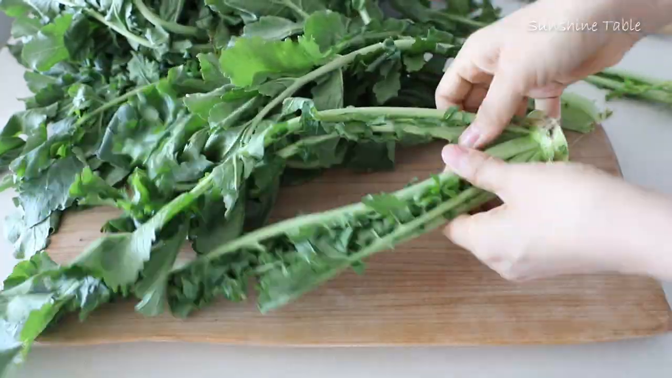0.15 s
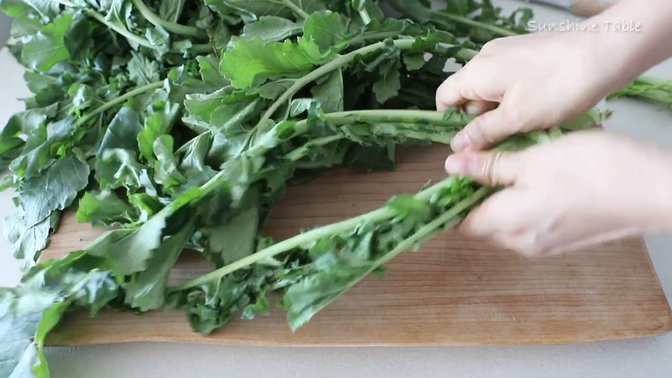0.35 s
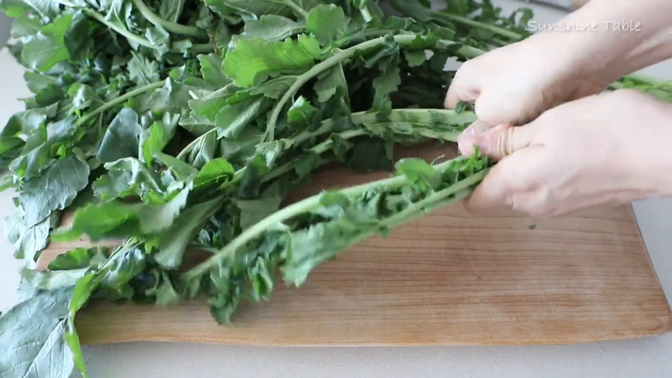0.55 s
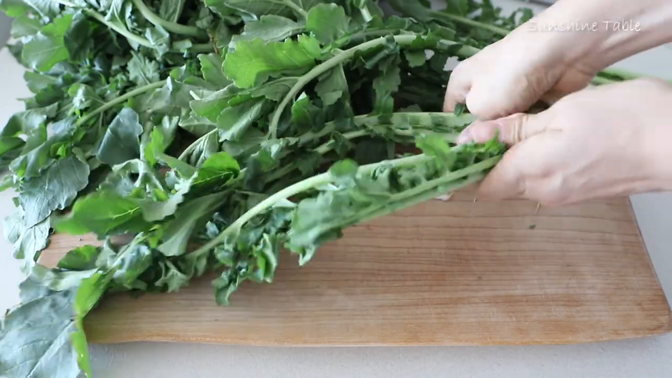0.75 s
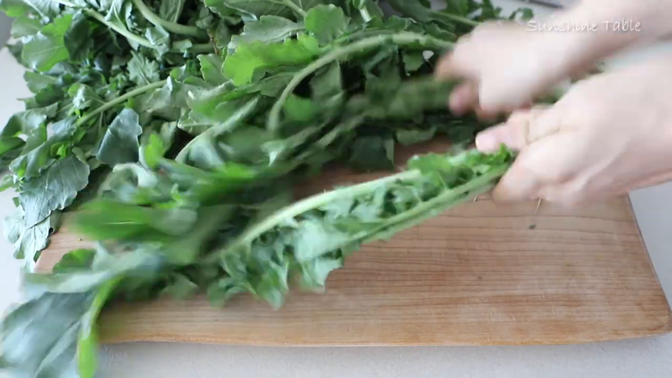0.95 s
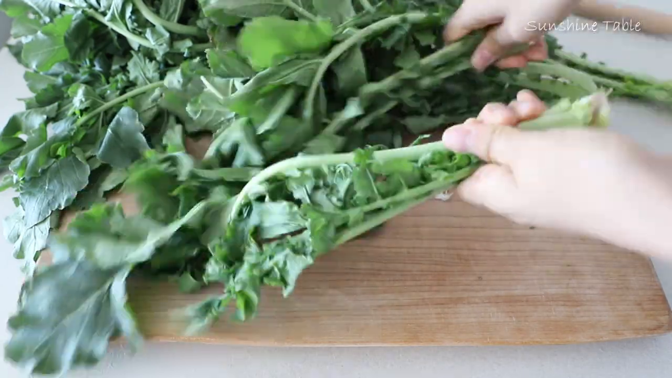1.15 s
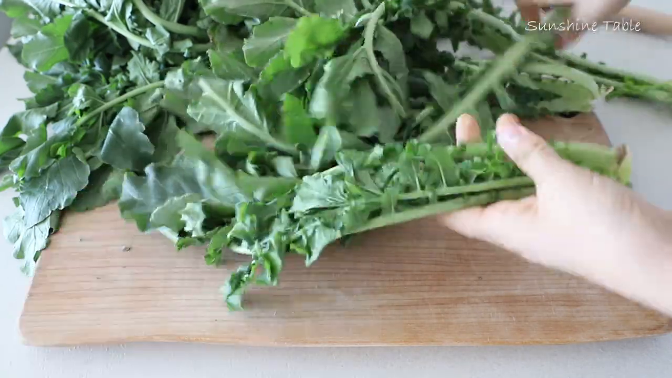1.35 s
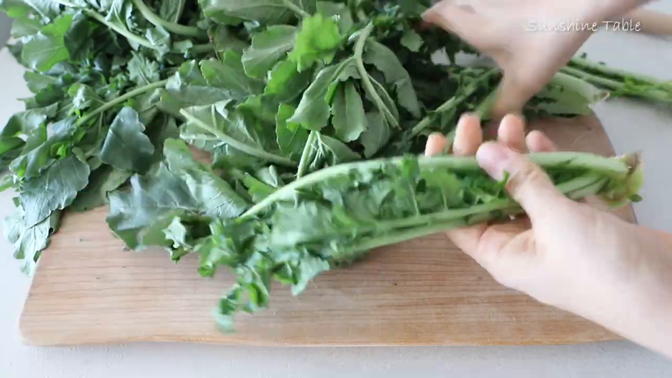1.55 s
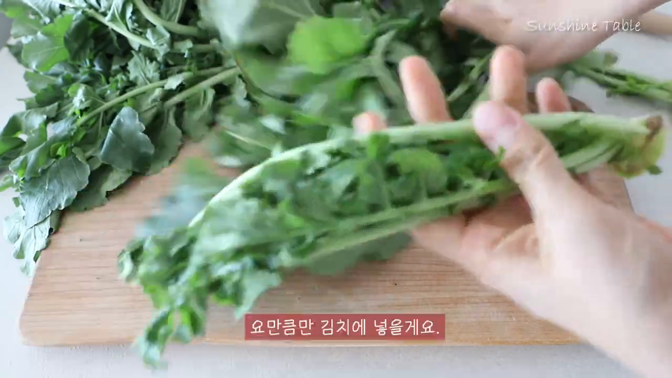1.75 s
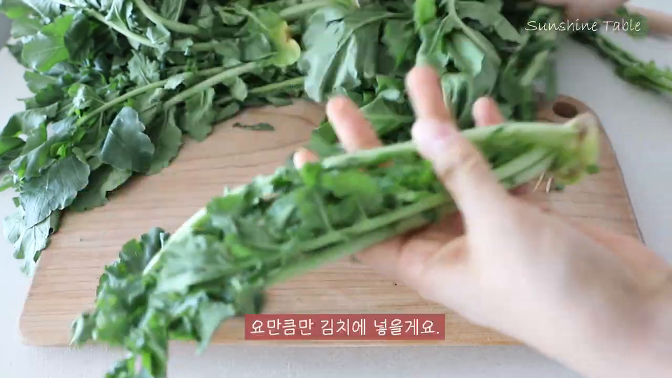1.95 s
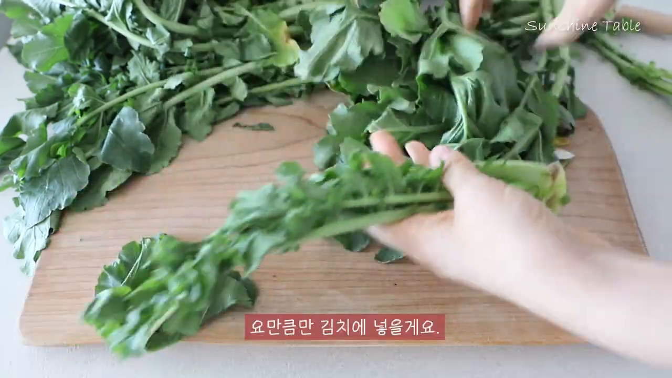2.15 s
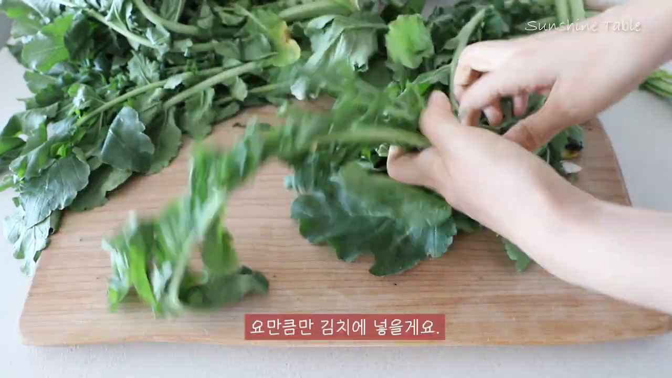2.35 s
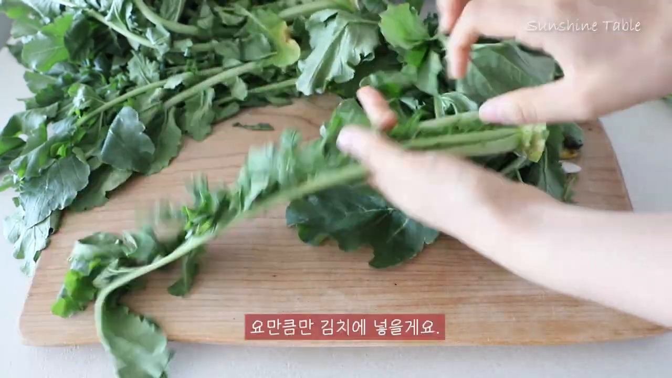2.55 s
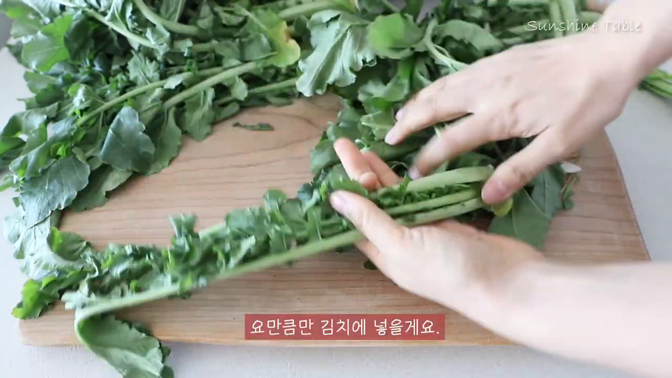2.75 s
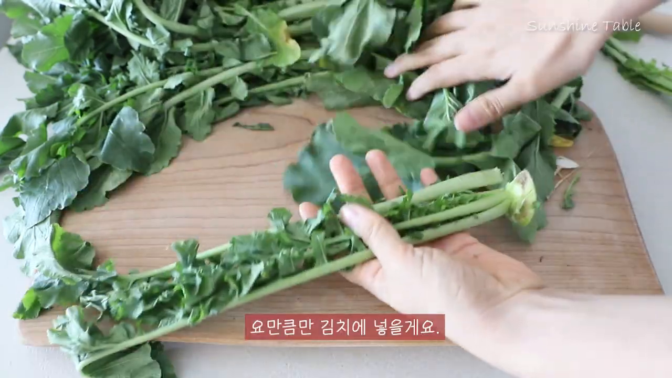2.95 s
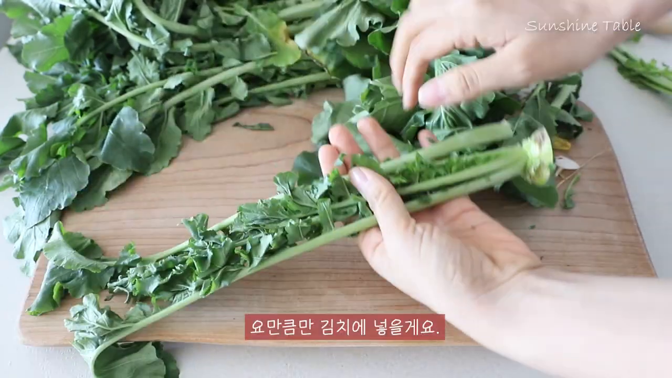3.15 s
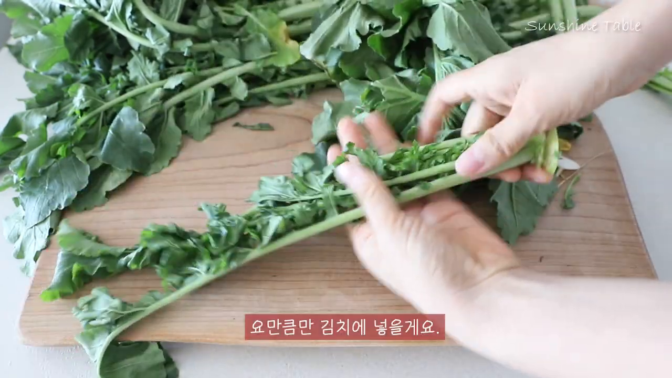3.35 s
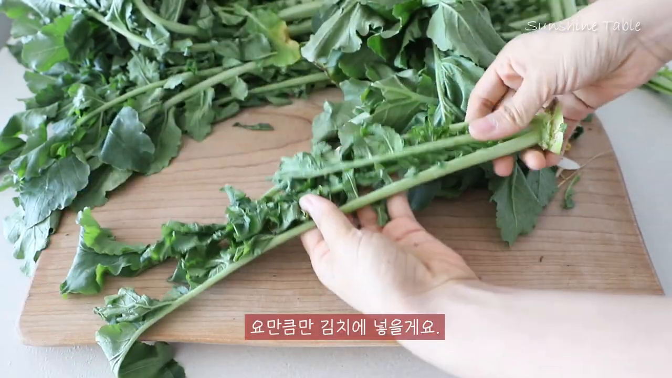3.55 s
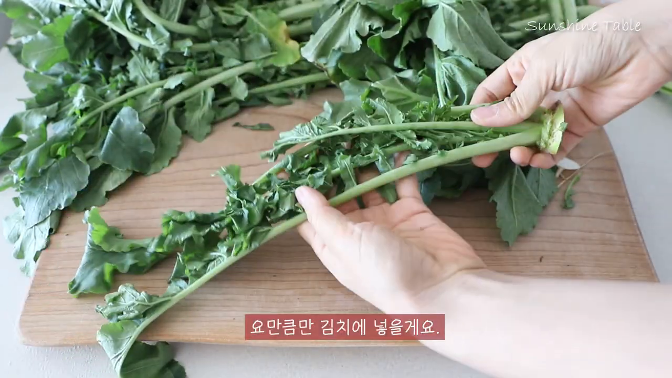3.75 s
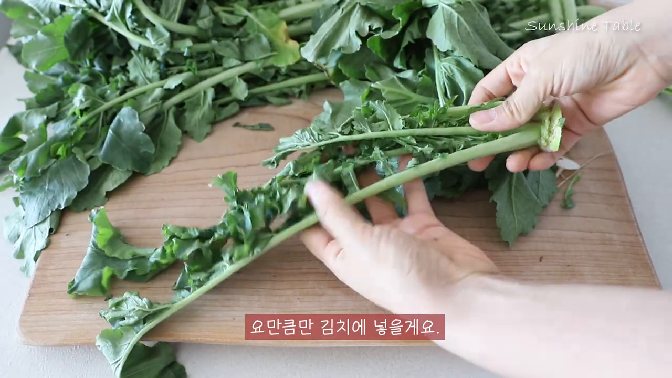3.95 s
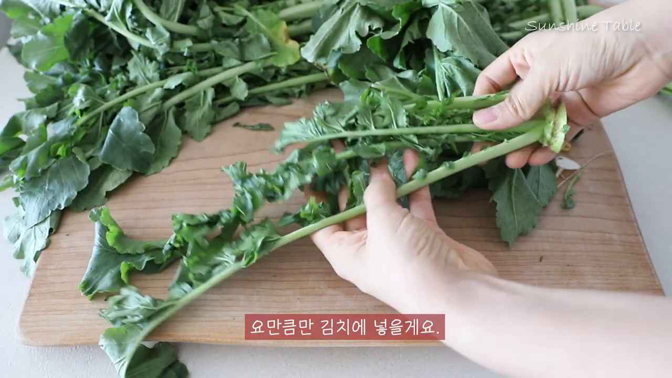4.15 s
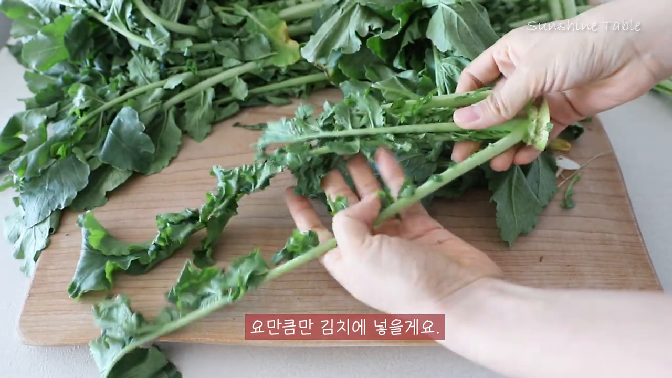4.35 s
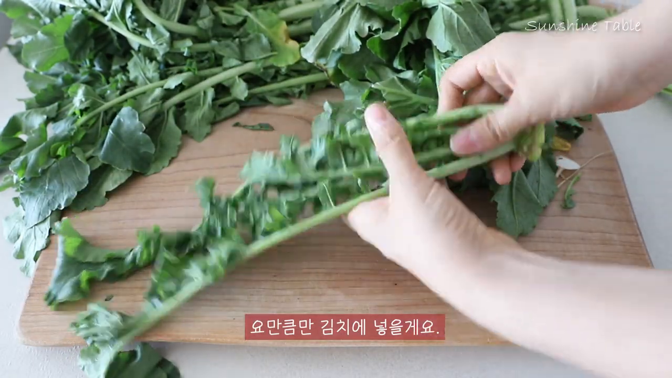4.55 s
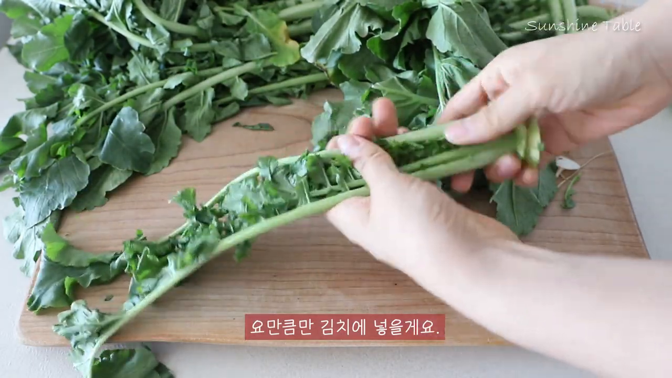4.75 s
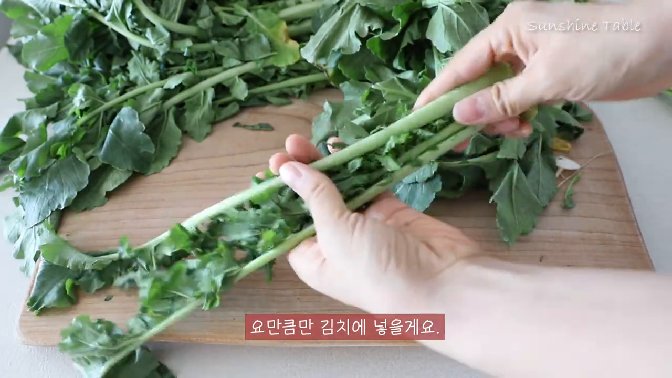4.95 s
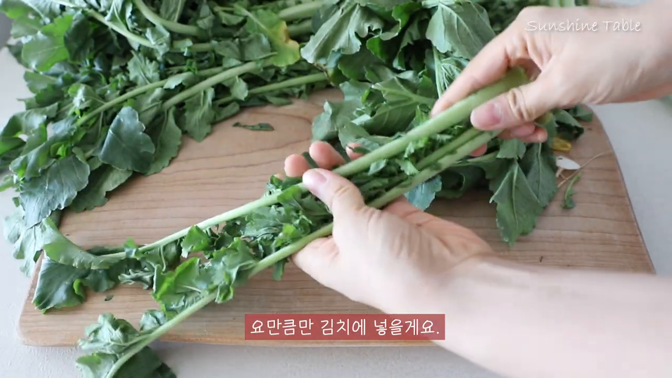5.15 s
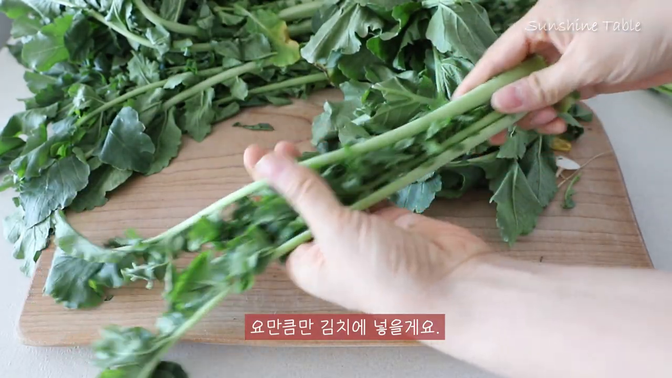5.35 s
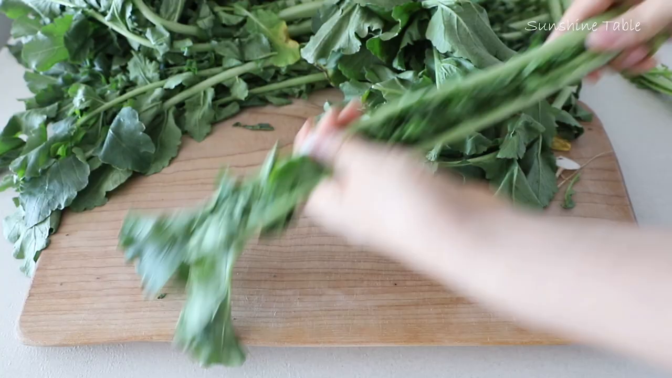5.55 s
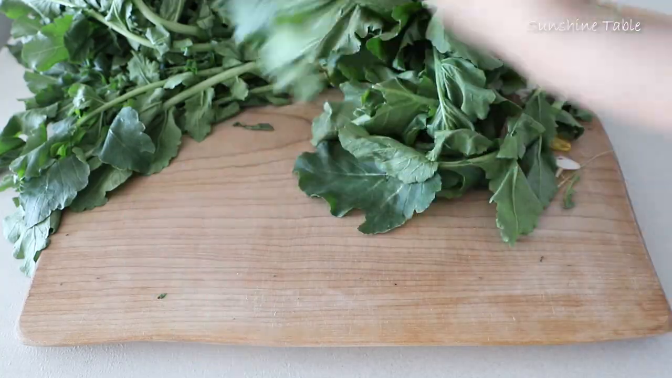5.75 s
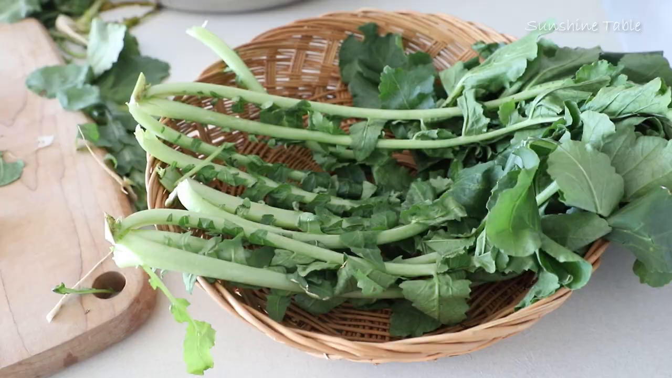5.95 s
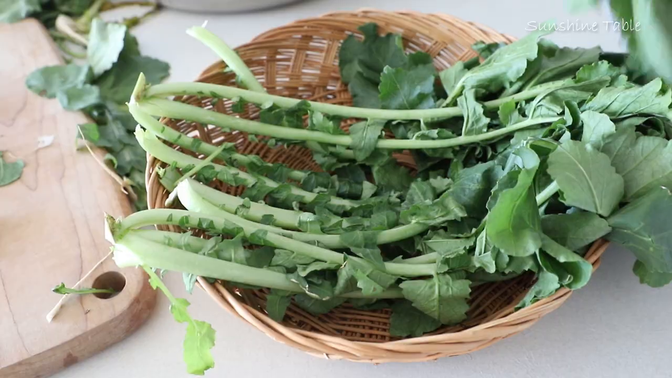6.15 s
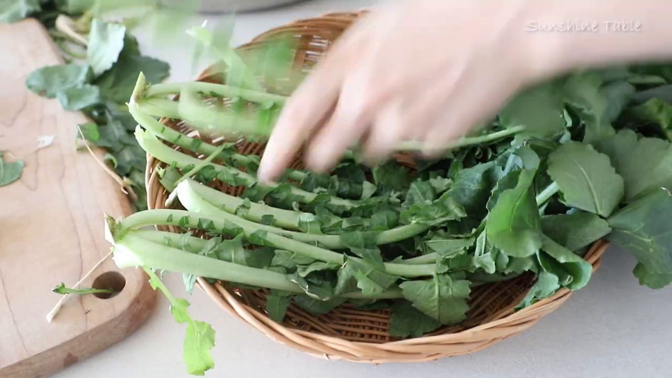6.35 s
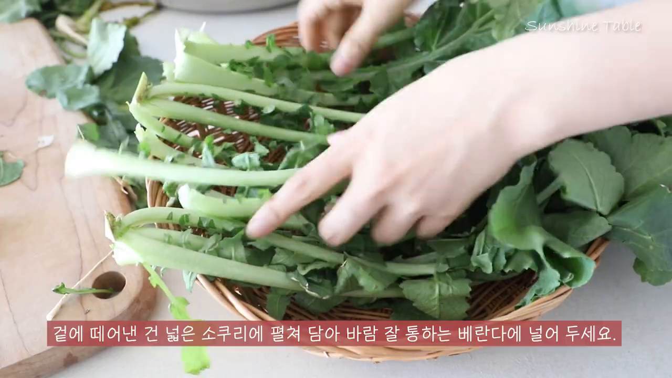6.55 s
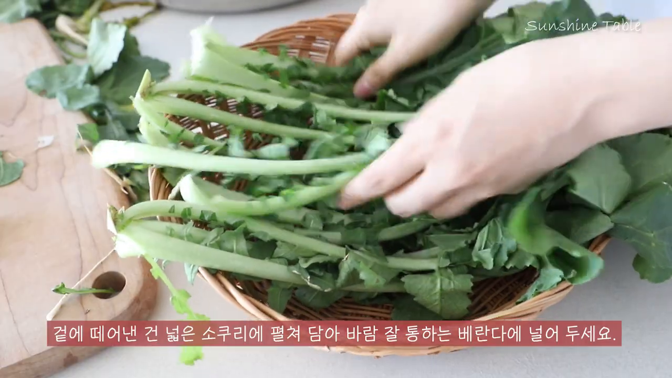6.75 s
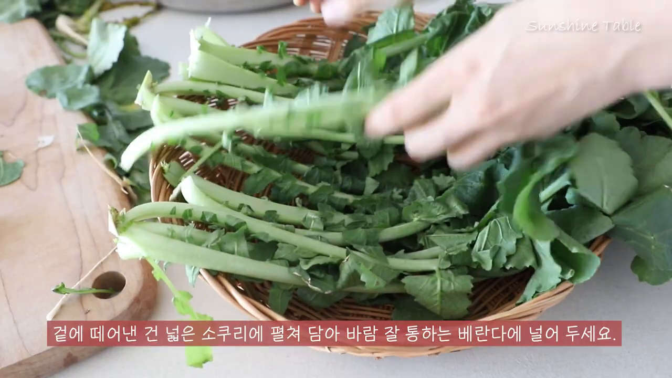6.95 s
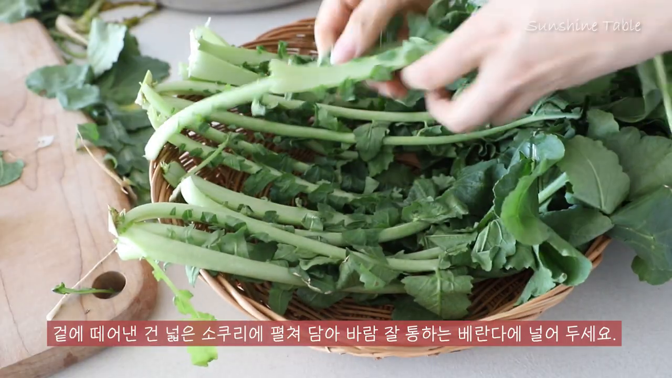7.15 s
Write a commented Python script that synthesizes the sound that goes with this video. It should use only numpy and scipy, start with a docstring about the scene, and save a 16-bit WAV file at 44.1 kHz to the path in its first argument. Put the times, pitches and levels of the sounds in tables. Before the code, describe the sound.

Crisp leafy stalks crackle and snap loudly up close, then leaves rustle in busy bursts, fade to faint brushing, and rustle again in a quiet kitchen.

```python
"""A crisp stalk cracks fibre by fibre and snaps as radish greens are stripped by hand on a wooden board, close by.
Noise bursts excite short stalk resonances; clumped micro-clicks make the leaves that are dragged, pressed
on a pile and turned over before the bunch is laid in a wicker basket. Hands and stalks bump the board,
heard as decaying modes. Faint reflections, room air and the tones of an appliance fill a quiet kitchen."""
import sys
import numpy as np
from scipy import signal
from scipy.fft import rfft, irfft
from scipy.io import wavfile

SR = 44100
rng = np.random.default_rng(int(sys.argv[2]) if len(sys.argv) > 2 else 0)


def pcm_store(signal):
    """Save signal as 16-bit PCM."""
    levels = np.round(np.clip(np.atleast_2d(signal), -1, 1) * 32767)
    wavfile.write(sys.argv[1], SR, levels.astype(np.int16).T)


N = 317517
TIME = np.arange(N) / SR


def amp(db):
    """Decibel law: level to amplitude gain."""
    return 10 ** (np.asarray(db) / 20)


def unit(x):
    """Normalization to an rms amplitude of 1."""
    return x / np.sqrt(np.mean(x ** 2) + 1e-20)


def read(points, hz):
    """Linear interpolation of a table on a logarithmic frequency axis."""
    table_hz, value = np.transpose(points)
    return np.interp(np.log(hz + 1), np.log(table_hz + 1), value)


def add(mix, s, sound):
    """Superposition: adds a sound to the mix from time s."""
    part = mix[max(round(s * SR), 0):][:len(sound)]
    part += sound[:len(part)]


def colour(x, points, size=4096):
    """Minimum-phase filtering: a spectrum is imposed causally, so clicks keep a sharp front."""
    log_gain = np.log(amp(read(points, abs(np.fft.fftfreq(size, 1 / SR)))))
    taps = np.fft.ifft(np.exp(np.conj(signal.hilbert(log_gain)))).real
    return signal.oaconvolve(x, taps[:size // 2])[:len(x)]


def resonate(x, hz, width_hz):
    """Damped resonance: a pole pair whose radius sets the bandwidth."""
    radius = np.exp(-np.pi * width_hz / SR)
    poles = [1, -2 * radius * np.cos(2 * np.pi * hz / SR), radius * radius]
    return signal.lfilter([1, 0, -1], poles, x)


def wander(per_s):
    """Low-passed noise: a smooth random course of rms 1 that changes about per_s times a second."""
    spectrum = rfft(rng.standard_normal(N))
    rolloff = 1 + (np.fft.rfftfreq(N, 1 / SR) / per_s) ** 4
    return unit(irfft(spectrum / rolloff, N))


def grains(per_s, spread_db):
    """Shot noise: clicks at random times, random in sign, with levels exponentially spread in dB."""
    size = amp(spread_db * np.minimum(rng.exponential(1, N), 4.5))
    sign = rng.choice([-1, 1], N)
    return unit(size * sign * (rng.random(N) < per_s / SR))


# Fibres of stalks and leaf ribs giving way; levels before the shared trims in snaps().
# Columns: start_s, ring_level_db, ring_hz, crack_level_db, length_s
FIBRE_SNAPS = [(.057, -34, 2900, -42, .003), (.2087, -39, 3470, -50, 0.004),
               (0.393, -50, 3300, -51, 0.00084), (.5125, -25.5, 3630, -24, 0.00092),
               (.5197, -28, 3220, -28, 0.0013), (0.548, -21.5, 4140, -25, 0.0011),
               (.6085, -33, 4060, -41, .0006), (.6197, -19.5, 3400, -30, 0.0012),
               (0.625, -26, 3620, -30, .0006), (0.641, -16, 3560, -23, 0.00077),
               (0.8357, -35, 3440, -27.5, 0.00073), (.8377, -26, 2750, -29, 0.001),
               (.84, -28, 3270, -32.5, 0.0012), (.8604, -25.5, 3840, -15.5, 0.00056),
               (.9507, -41, 3510, -33.5, 0.0013), (0.974, -48, 3400, -49, .0008),
               (0.9877, -32, 3760, -27.5, 0.0016), (.9932, -30, 3140, -40, 0.0013),
               (1.004, -36, 3400, -36, 0.0018), (1.0129, -29, 3650, -33, 0.0025),
               (1.02, -28, 3870, -29, .0005), (1.0215, -26, 3750, -26, 0.0015),
               (1.027, -11.5, 3630, -18, 0.0025), (1.0303, -14, 2660, -29, 0.00098),
               (1.985, -29, 3370, -34, .0027), (2.003, -25, 3370, -39, .0036),
               (2.021, -24, 3340, -42, 0.0045), (2.255, -34.5, 3360, -50, .0007),
               (2.555, -37.5, 3050, -56, .0025), (3.308, -48, 2800, -60, 0.0019),
               (3.3594, -63, 3580, -44, 0.0059), (3.368, -58, 3820, -46, 0.0037),
               (3.738, -64, 3280, -47, .0017), (3.747, -64, 3240, -46, .0016),
               (4.244, -55.5, 3170, -64, 0.0034), (5.102, -54, 4260, -43, .0008),
               (5.239, -46, 3670, -51, 0.0026), (5.977, -52, 3900, -56, .0012),
               (6.0305, -50, 3740, -37, .0005), (6.6005, -36.5, 3380, -48, 0.0038),
               (6.745, -39, 3270, -51, .0025), (6.866, -35, 3460, -43, 0.0027),
               (7.07, -41, 5400, -50.5, .003)]
# Relative spectrum of a bright crack, for snaps() and rib_ticks(). Columns: frequency_hz, density_db
CRACK_SPECTRUM = [(200, -30.5), (700, -9.5), (1500, -7), (3000, 2), (4800, 1.5), (6200, 5.5), (8000, 0),
                  (10000, 2.5), (13000, 2), (16000, -4)]


def snaps(crack_share=0.76, tear_share=0.95, ring_width_hz=950, ring_tear=0.23, ring_db=1.16, crack_db=0.9):
    """Impulsive fracture: a failing fibre bundle emits a bright crack and rings the juicy stalk briefly."""
    out, t = np.zeros(N), np.arange(1024) / SR
    span = np.sqrt(.003 * SR / len(t))  # refers the rms levels to 3 ms
    for s, body_db, hz, bright_db, length_s in FIBRE_SNAPS:
        fibres, splinters = rng.standard_normal((2, len(t)))
        release = (t == 0) + ring_tear * fibres * np.exp(-t / (tear_share * length_s))
        ring = resonate(resonate(release, hz, ring_width_hz), hz, ring_width_hz)
        crack = colour(splinters * np.exp(-t / (crack_share * length_s)), CRACK_SPECTRUM)
        ring_part = amp(body_db + ring_db) * unit(ring)
        crack_part = amp(bright_db + crack_db) * unit(crack)
        add(out, s, span * (ring_part + crack_part))
    return out


# Relative spectrum of the deep crunch as a stalk breaks through. Columns: frequency_hz, density_db
BREAK_SPECTRUM = [(100, -35.5), (400, -36), (1000, -20.5), (1600, -5.5), (2100, 1), (2500, 3), (2900, -6.5),
                  (3400, -21), (5000, -31.5)]


def final_break(s=1.0272, db=-22, tear_share=.12, tear_s=0.0016):
    """Sudden release: the whole thickness of the stalk parts in one deep push with a splintering tail."""
    out, t = np.zeros(N), np.arange(512) / SR
    release = (t == 0) + tear_share * rng.standard_normal(len(t)) * np.exp(-t / tear_s)
    add(out, s, amp(db) * unit(colour(release, BREAK_SPECTRUM)))
    return out


# Jolts of the stalk as a whole fibre bundle parts; levels before onset and decay.
# Columns: start_s, level_db
STALK_JOLTS = [(.642, -28.5), (.837, -34), (1.028, -22)]


def recoil(hz=638, t60_s=0.016):
    """Elastic recoil: the jolted stalk gives a dull knock, an exponentially damped sine."""
    out, t = np.zeros(N), np.arange(2048) / SR
    onset = 1 - np.exp(-2 * hz * t)
    knock = np.sin(2 * np.pi * hz * t) * amp(-60 * t / t60_s) * onset
    for s, db in STALK_JOLTS:
        add(out, s, amp(db) * knock)
    return out


def rib_ticks(crinkle_db, db=-60, follow=0.92, bright_db=-5, ring_hz=3400, ring_width_hz=1100, tear_s=0.0019):
    """Random microfracture: small ribs crack faintly and ring, with a level that follows the strokes."""
    decay = np.exp(-1 / (tear_s * SR))
    fibres = signal.lfilter([1], [1, -decay], abs(grains(per_s=22, spread_db=2.0)))
    tear = fibres * rng.standard_normal(N)
    ring = resonate(resonate(tear, ring_hz, ring_width_hz), ring_hz, ring_width_hz)
    sound = unit(ring) + amp(bright_db) * unit(colour(tear, CRACK_SPECTRUM))
    return sound * amp(db + follow * (crinkle_db - crinkle_db.mean()))


# Strokes of the hands through the leaves; levels before the trims in rustle(), the last two relative to crinkling.
# Columns: peak_s, rise_s, fall_s, crinkle_level_db, rub_level_db, brush_level_db
HAND_STROKES = [(0.05, 0.25, 0.064, -44, -6.5, -3), (0.117, 0.026, 0.047, -45.5, -11, 1),
                (0.258, 0.25, 0.093, -44, -9.5, -7.0), (0.426, 0.038, 0.156, -51, -4.5, -2.5),
                (0.553, 0.081, 0.092, -37.5, -14.5, -7.5), (0.637, 0.039, 0.043, -32.5, -21, -12.5),
                (0.874, 0.12, 0.062, -41.5, -10.0, -7), (1.078, 0.051, 0.093, -31, -9.5, -8.5),
                (1.17, 0.088, 0.23, -50, -11.5, 8.5), (1.376, 0.16, 0.123, -32.5, -11.0, -9),
                (1.647, 0.083, 0.046, -41.5, -12.5, -10.5), (1.774, 0.093, 0.169, -38.0, -8, -1.5),
                (1.861, 0.038, 0.16, -32.0, -9, -7), (2.041, 0.073, 0.044, -28.5, -13.5, -12),
                (2.148, 0.25, 0.049, -43, -5, -5.5), (2.33, 0.088, 0.15, -37.0, -9, -9.5),
                (2.554, 0.0307, 0.11, -40.0, -11.5, -9.5), (2.665, 0.104, 0.083, -45, -10.5, -5.5),
                (2.817, 0.048, 0.21, -44.5, -9, 0), (3.005, 0.137, 0.074, -30, -9.0, -10),
                (3.122, 0.04, 0.13, -39.5, -6.5, -10.5), (3.356, 0.011, 0.24, -56.0, -11, 2.5),
                (3.489, 0.015, 0.014, -50, -12.5, 2), (3.586, 0.12, 0.015, -54.0, -9.5, 3.5),
                (3.685, 0.1, 0.113, -60, -2.5, 7), (3.872, 0.16, 0.13, -62.5, -3.5, 5.5),
                (4.024, 0.045, 0.042, -61.0, -5.5, 8.5), (4.163, 0.095, 0.13, -64, -4, 6),
                (4.391, 0.077, 0.15, -57.5, -19, -0.5), (4.657, 0.08, 0.042, -48.5, -14, -4),
                (4.745, 0.0445, 0.076, -52.5, -16, -6.5), (4.914, 0.069, 0.139, -57.5, -12, 0.5),
                (5.047, 0.083, 0.061, -53.5, -16, 4.5), (5.242, 0.18, 0.0303, -62.5, -13, 6.5),
                (5.483, 0.14, 0.0326, -55, -9, 9.5), (5.597, 0.159, 0.098, -50.5, -12.5, 3.5),
                (5.793, 0.083, 0.14, -54.5, -10, 2), (6.033, 0.022, 0.138, -47.5, -8, -1.5),
                (6.114, 0.05, 0.106, -46, -10, 1), (6.195, 0.0206, 0.1, -41.5, -12.5, -5.5),
                (6.323, 0.118, 0.054, -46.5, -6.5, -11.0), (6.429, 0.09, 0.039, -45, -8.5, -22),
                (6.605, 0.24, 0.027, -43, -5.5, -3), (6.751, 0.11, 0.016, -42.5, -5, -5.5),
                (6.89, 0.14, 0.063, -41.5, -8.5, -7.5), (6.925, 0.015, 0.12, -41, -5.5, -8),
                (7.178, 0.15, 0.08, -44, -9.5, -2.5)]


def effort(drop_db=10.1, curve=1.4):
    """Power summation: strokes swell, fade and overlap, giving courses of crinkle, rub and brush in dB.

    drop_db is the level lost over one rise or fall time; curve sets how round the peak is.
    """
    t = TIME[::64]
    power = np.full((3, len(t)), 1e-10)
    for s, rise_s, fall_s, db, rub_db, brush_db in HAND_STROKES:
        away = abs(t - s) / np.where(t < s, rise_s, fall_s)
        peak_db = db + np.array([[0], [rub_db], [brush_db]])
        power += amp(peak_db - drop_db * away ** curve) ** 2
    return [np.interp(TIME, t, 10 * np.log10(p)) for p in power]


# Relative spectra of crinkling blades, leaf-on-leaf rubbing, light brushing and scraping leaf edges.
# Columns of each: frequency_hz, density_db
CRINKLE_SPECTRUM = [(1200, -36.5), (2000, -12.5), (2700, -9), (3200, -3.5), (3600, 1.5), (4050, -1),
                    (4600, -9), (5500, -12), (8000, -15.5), (16000, -64.5)]
RUB_SPECTRUM = [(200, -19.5), (500, -5), (900, -2), (1400, 1.5), (2100, 2), (2800, 0), (4000, -24),
                (8000, -40)]
BRUSH_SPECTRUM = [(5000, -33.5), (7500, -5), (9500, 1), (12000, 1), (14000, 0), (16000, -4.5)]
SCRAPE_SPECTRUM = [(3000, -22), (4800, -1), (6200, -0.5), (7300, -1), (9000, -2.5), (16000, -20)]


def rustle(crinkle_db, rub_db, brush_db):
    """Stick-slip and buckling: clumps of micro-clicks in the leaves excite every register at once."""
    clumps = wander(per_s=48)
    buckles = grains(per_s=1100, spread_db=2.5)
    # a sticking leaf lets go at once, and the slip decays with a time constant of 3.3 ms
    slip_decay = np.exp(-1 / (0.0033 * SR))
    slips = unit(signal.lfilter([1], [1, -slip_decay], grains(per_s=130, spread_db=1.55) ** 2))

    def layer(points, slip_share, clump_db, own_db):
        """Friction noise: shared buckling clicks plus the fine grains of one register."""
        drive = 0.44 * buckles + grains(per_s=9000, spread_db=1.5)
        drive = drive * np.sqrt(1 + slip_share * slips)
        level_db = clump_db * clumps + own_db * wander(per_s=150)
        return unit(colour(drive * amp(level_db), points))

    crinkle = amp(crinkle_db - 1.5) * layer(CRINKLE_SPECTRUM, slip_share=0.786, clump_db=0.5, own_db=0.1)
    rub = amp(rub_db + 0.37) * layer(RUB_SPECTRUM, slip_share=0.66, clump_db=1.0, own_db=1.5)
    brush = amp(brush_db) * layer(BRUSH_SPECTRUM, slip_share=0.62, clump_db=1.0, own_db=1.5)
    # leaf edges scrape with the brushing and, a little, with the bending
    scrape_db = brush_db + 0.13 * (crinkle_db - brush_db) - 4.5
    scrape = amp(scrape_db) * layer(SCRAPE_SPECTRUM, slip_share=0.43, clump_db=0.5, own_db=2.0)
    # folds in the blades pop over and leaves pat each other
    pops = amp(crinkle_db - 11.5) * pips(2670, 4250, per_s=140, length_s=0.00038, spread_db=0.5)
    pats = amp(rub_db - 13.5) * pips(814, 2380, per_s=110, length_s=0.0006, spread_db=-1.5)
    return leaf_colours(crinkle + rub + brush + scrape) + pops + pats + bristles(brush_db)


def leaf_colours(x, patch_db=1.78, leaf_s=0.029, width_hz=1300):
    """Time-varying filtering: leaves in contact lend the rustle passing resonances, drawn as smooth random gains."""
    z = signal.stft(x, SR, nperseg=256, noverlap=192)[2]
    slow = np.fft.fftfreq(z.shape[1], 64 / SR)
    broad = np.fft.fftfreq(z.shape[0], SR / 256)
    smooth = np.exp(-(2 * slow * leaf_s) ** 2 - (2 * broad[:, None] * width_hz) ** 2)
    patches = unit(np.fft.ifft2(np.fft.fft2(rng.standard_normal(z.shape)) * smooth).real)
    return signal.istft(z * unit(amp(patch_db * patches)), SR, nperseg=256, noverlap=192)[1][:N]


def bristles(brush_db, db=-60, follow=0.68):
    """Impulse excitation: stiff stalk hairs flick past the fingers, with a level that follows the brushing."""
    flicks = pips(6360, 14950, per_s=120, length_s=0.00017, spread_db=3.5)
    return flicks * amp(db + follow * (brush_db - brush_db.mean()))


def pips(lo_hz, hi_hz, per_s, length_s, spread_db, count=24):
    """Damped oscillation: sparse short rings over a bank of pitches, as of folds or hairs."""
    t, out = np.arange(512) / SR, np.zeros(N)
    for hz in np.geomspace(lo_hz, hi_hz, count):
        age = t / (length_s * rng.uniform(.5, 2.2))
        ring = age * np.exp(-age) * np.sin(2 * np.pi * hz * t)
        out += signal.oaconvolve(grains(per_s / count, spread_db), unit(ring))[:N]
    return unit(out)


# Hands and stalks bumping the board or basket; the blow favours modes near blow_hz: low if soft, high if hard.
# Columns: start_s, level_db, blow_hz
BLOWS = [(.001, -33, 133), (1.028, -39.5, 180), (1.05, -48, 56), (1.086, -54, 125), (1.778, -37, 139),
         (1.812, -34.5, 280), (1.889, -42, 246), (2.954, -42, 500), (3.075, -39.5, 165), (3.13, -39, 500),
         (3.15, -42, 169), (3.565, -48.5, 150), (6.029, -50, 56), (6.587, -40, 427), (6.597, -38.5, 160),
         (6.854, -42, 156), (6.938, -45, 175)]
# Modes of the board, levels relative to the blow. Columns: mode_hz, level_db, t60_s
BOARD_MODES = [(57, 2, .22), (143.2, -2.5, .16), (168.5, -7, 0.2), (250, -1.5, .09), (343, -2, .055),
               (490, -3, 0.12)]
# Relative spectrum of the bunch scuffing over wood. Columns: frequency_hz, density_db
SCUFF_SPECTRUM = [(25, -5.5), (60, -12.5), (150, 0), (260, 2.5), (400, -2.5), (600, -2), (1200, -33),
                  (4000, -45.5)]


def board(rub_db, scuff_db=-64, follow=0.37, thud_noise=0.29, focus_db=22):
    """Modal superposition: blows ring modes near their pitch, focus_db less an octave away; the bunch scuffs."""
    scuff = unit(colour(grains(per_s=900, spread_db=2.5), SCUFF_SPECTRUM))
    out = amp(scuff_db + follow * (rub_db - rub_db.mean())) * scuff
    t = np.arange(SR // 3) / SR
    for s, db, blow_hz in BLOWS:
        for hz, mode_db, t60_s in BOARD_MODES:
            flutter = unit(resonate(rng.standard_normal(len(t)), hz, hz))
            ring = np.sin(2 * np.pi * hz * t) + thud_noise * flutter
            level_db = db + mode_db - focus_db * np.log2(hz / blow_hz) ** 2
            onset = 1 - np.exp(-2 * hz * t)
            add(out, s, ring * amp(level_db - 60 * t / t60_s) * onset)
    return out


# Reverberation time of the kitchen. Columns: frequency_hz, t60_s
KITCHEN_DECAY = [(200, .3), (1000, 0.31), (4000, 0.34), (14000, 0.099)]


def kitchen(x):
    """Diffuse reverberation: dense reflections from table and walls decay, the high treble first."""
    t = TIME[:SR // 2]
    taps = rng.standard_normal(len(t)) * (rng.random(len(t)) < 4000 / SR) * (t > .003)
    hz, frame_s, z = signal.stft(taps, SR, nperseg=128)
    decay = amp(-60 * frame_s / read(KITCHEN_DECAY, hz)[:, None])
    tail = signal.istft(z * decay, SR, nperseg=128)[1]
    return signal.fftconvolve(x, tail / np.linalg.norm(tail))[:N]


# Relative spectrum of the room air. Columns: frequency_hz, density_db
AIR_SPECTRUM = [(25, -9), (90, 0.5), (160, -3.5), (300, -3.5), (400, -12.5), (550, -8), (800, -14),
                (2300, -21.5), (3000, -27), (3750, -10.5), (5000, -26), (9000, -28), (16000, -30)]
# Course of the faint appliance drone, as rms level. Columns: time_s, level_db
DRONE_COURSE = [(0, -70), (1.4, -67), (1.7, -77), (3.7, -75.5), (4.45, -66), (5.0, -72.5), (5.6, -83.5),
                (7.2, -79)]


def background(air_db=-61, hum_db=-70.0, hum_hz=80.0, drone_hz=319, waver_db=3.5):
    """Stationary noise and modulated tones: room air, a low appliance hum and a drone that comes and goes."""
    air = amp(air_db) * unit(colour(rng.standard_normal(N), AIR_SPECTRUM))
    hum_gain = amp(hum_db + waver_db * wander(per_s=4.3))
    hum = hum_gain * np.sin(2 * np.pi * hum_hz * TIME + 2.1 * wander(per_s=3.2))
    drone_gain = amp(np.interp(TIME, *np.transpose(DRONE_COURSE)))
    drone = drone_gain * np.sin(2 * np.pi * drone_hz * TIME + .5 * wander(per_s=4))
    return air + np.sqrt(2) * (hum + drone)  # root 2 turns rms levels into sine peaks


def scene():
    """Superposition: direct sounds, their reflections and the background add linearly."""
    crinkle_db, rub_db, brush_db = effort()
    cracks = snaps() + final_break() + rib_ticks(crinkle_db)
    leaves = rustle(crinkle_db, rub_db, brush_db)
    near = cracks + leaves + recoil() + board(rub_db)
    reflected = kitchen(amp(-19.0) * cracks + amp(-17.5) * leaves)
    return (near + reflected + background())[None]


def record(dry, edge_hz=15950):
    """Band limitation: peaks clip at full scale, then a linear-phase low-pass removes what lies above edge_hz."""
    lowpass = signal.firwin(301, edge_hz, window=("kaiser", 8), fs=SR)
    return signal.oaconvolve(np.clip(dry, -1, 1), lowpass[None], "same")


dry = scene()
out = record(dry)
pcm_store(out)
```